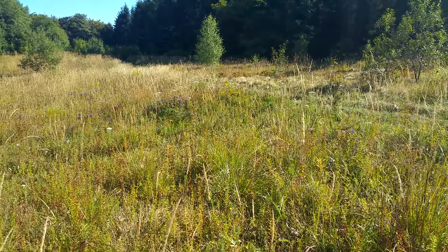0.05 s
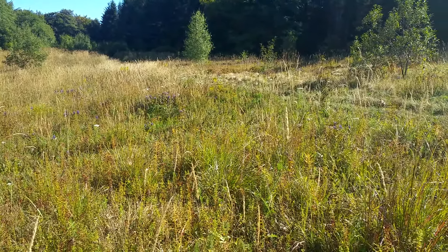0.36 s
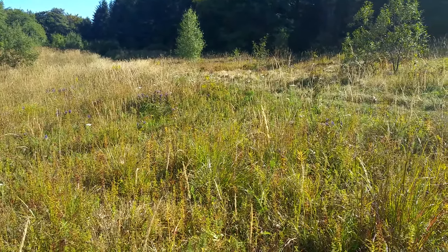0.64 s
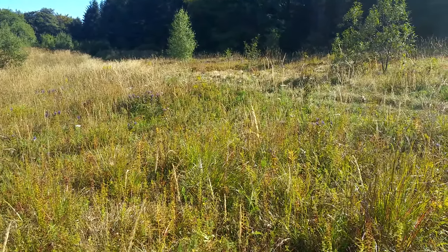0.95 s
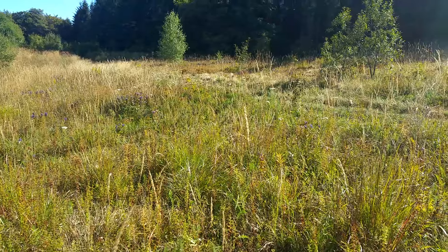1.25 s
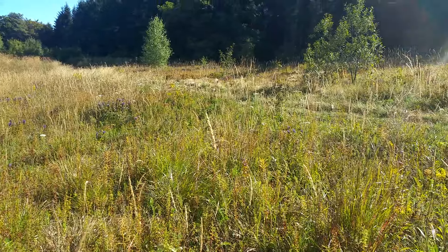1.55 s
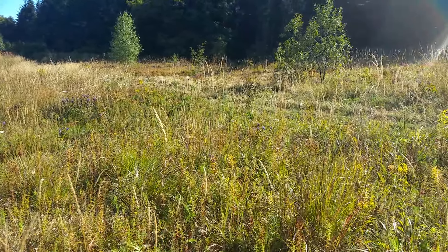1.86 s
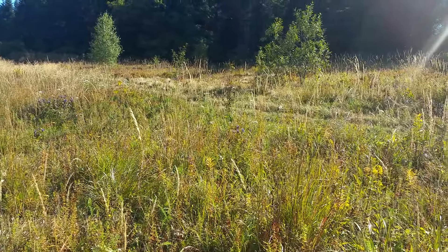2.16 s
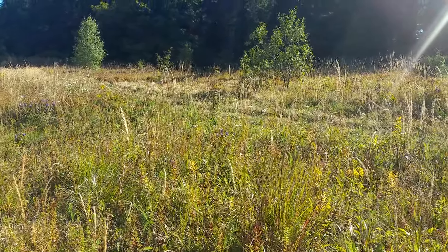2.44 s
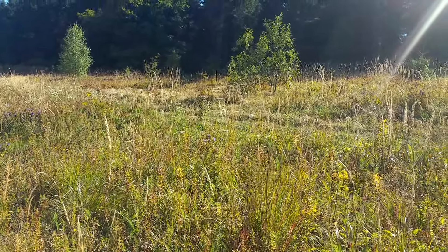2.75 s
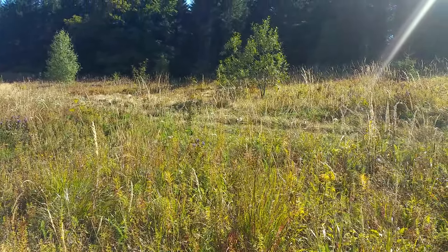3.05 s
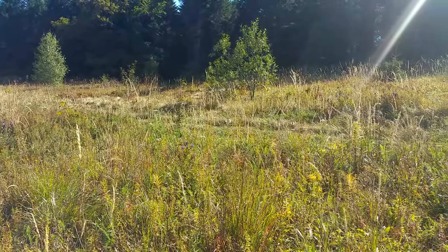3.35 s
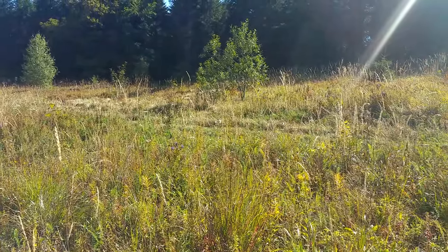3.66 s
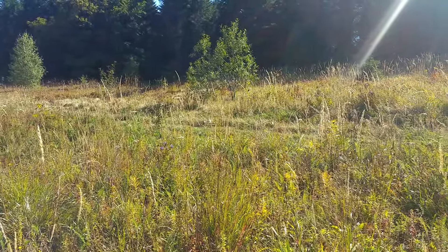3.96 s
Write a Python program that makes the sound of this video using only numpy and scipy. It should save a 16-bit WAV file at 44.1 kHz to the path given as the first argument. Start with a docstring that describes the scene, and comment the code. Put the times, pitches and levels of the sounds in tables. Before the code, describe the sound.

High, steady cricket buzzing in a field, joined late by quick close chirps.

```python
"""Bush crickets buzz in a sunny meadow, scraping toothed wings at about fifty strokes a second.
A close one joins with quick chirps, and a far chorus shimmers behind them all.
Treble bands swell and fade as the hand-held microphone slowly turns. Brushed grass rustles
and ticks, the hand bumps the housing, and a light breeze touches the microphone."""
import sys
import numpy as np
from scipy import signal
from scipy.fft import rfft, irfft
from scipy.io import wavfile

SR = 44100
rng = np.random.default_rng(int(sys.argv[2]) if len(sys.argv) > 2 else 0)


def wav_out(sig):
    """Save sig, one row per channel (or a flat mono array), as 16-bit PCM at SR to the path in sys.argv[1]."""
    wavfile.write(sys.argv[1], SR, np.round(np.clip(np.atleast_2d(sig).T, -1, 1) * 32767).astype(np.int16))


N = 176400

# bed of still air over the field (f/Hz, level/dB)
AIR_COLOUR = [(20, -11), (60, -2.5), (170, 0.5), (300, -1), (600, -5.5), (1500, -8.5), (3200, -12),
              (4800, -14), (8000, -19.5), (16000, -34)]
# breeze on the microphone: gusts (t/s, level/dB) and rumble (f/Hz, level/dB)
BREEZE_LEVEL = [(0, -86), (1.18, -80), (1.28, -66), (1.45, -60.5), (1.58, -66), (1.66, -62.5), (1.8, -49.5),
                (1.89, -69), (2.1, -70), (2.3, -78), (2.7, -79), (2.85, -56.5), (3.12, -60.5),
                (3.44, -68.5), (3.6, -50.5), (3.74, -67), (4, -73)]
BREEZE_COLOUR = [(12, -5), (30, -2), (55, 3), (100, -6.5), (170, -20.5), (400, -50.5), (1500, -60)]
# soft swish of brushed grass: fader (t/s, level/dB) and colour (f/Hz, level/dB)
SWISH_LEVEL = [(0, -88.5), (.45, -70.5), (.9, -72.5), (1.2, -60.5), (1.32, -67.5), (1.55, -65), (2.3, -73),
               (4, -98)]
SWISH_COLOUR = [(150, -14.5), (800, 0), (1800, -5.5), (6000, -23.5)]
# its crisp crunch: fader (t/s, level/dB) and colour (f/Hz, level/dB)
CRUNCH_LEVEL = [(0, -70.5), (.4, -70), (.6, -71), (1.1, -78), (1.19, -59), (1.235, -51), (1.275, -61),
                (1.3, -68), (1.58, -63.5), (1.75, -69), (2, -66.5), (2.3, -76), (4, -98)]
CRUNCH_COLOUR = [(500, -18), (1500, -8), (2700, 0), (4000, -3), (5200, -15.5), (9000, -32)]
# snapping stalks: cues (t/s, level/dB, centre f/Hz) and colour (multiple of centre, level/dB)
STALKS = [(.4587, -52, 2730), (.8226, -60.5, 3300), (1.229, -46, 2600), (1.2475, -46, 3560),
          (1.4955, -52.5, 2272), (1.570, -46.5, 3860), (1.589, -51.5, 3900), (1.636, -55, 2600),
          (1.739, -54.5, 4130), (1.7926, -46.5, 4060), (1.958, -53.5, 3240), (2.372, -60, 2930),
          (2.573, -59, 3620), (3.153, -55.5, 2900), (3.963, -59, 3900)]
STALK_COLOUR = [(.1, -10), (.5, -9.5), (.8, 2), (1.1, 2.5), (1.4, -13), (4, -30)]
# finger taps: cues (t/s, level/dB, centre f/Hz) and colour (multiple of centre, level/dB)
TAPS = [(.458, -60, 400), (.508, -55.5, 260), (.743, -58, 560), (3.475, -61.5, 1010)]
TAP_COLOUR = [(.2, -10), (1, 1.5), (2, -11), (5, -19.5), (16, -25.5)]
# bumps on the housing (t/s, f/Hz, envelope peak level/dB, rise/s)
BUMPS = [(1.751, 61.4, -41, 0.0074), (1.813, 62.2, -31, 0.007), (1.8352, 112.3, -31.5, 0.00444)]
# far chorus: fader (t/s, level/dB) and colour (f/Hz, level/dB)
CHORUS_LEVEL = [(0, -46.5), (.5, -48.5), (1.1, -48), (2.3, -48), (2.7, -49), (3, -50.5), (3.3, -53.5),
                (4, -46.5)]
CHORUS_COLOUR = [(4500, -35), (5500, -18.5), (6400, -17), (6900, -7), (7400, .5), (8500, 1), (9600, -2.5),
                 (10800, -1), (12000, -7), (13300, -10), (15000, -12.5), (16000, -9)]
# a lower buzzer and the faster neighbour that takes over (t/s, stroke rate/Hz, level/dB, ring f/Hz)
LOW_BUZZ = [(0, 63.8, -62, 7730), (.4, 47, -50, 7627), (.9, 51, -56.5, 7550), (1.4, 49.3, -52, 7450),
            (2, 46.2, -56.5, 7320), (2.6, 49.5, -57, 7060), (3, 44, -58, 7010), (3.15, 58, -72, 7120),
            (4, 69, -90, 7030)]
FAST_BUZZ = [(2.95, 76.7, -84, 7364), (3.15, 59, -58, 7440), (3.35, 59.5, -55, 7270),
             (3.55, 57.3, -53, 7230), (3.78, 55.5, -49.5, 7254), (4, 58.3, -46.5, 7267)]
# wing resonance of these two (f/Hz, level/dB)
LOW_WING = [(5500, -27.5), (6500, -27.5), (6950, -5), (7350, -3), (7700, -11), (8200, -14), (10000, -0.5),
            (12000, -28), (16000, -21)]
# close insect's chirps (last stroke t/s, level/dB)
CHIRPS = [(2.625, -45.5), (2.734, -41.5), (2.844, -39), (2.951, -40.5), (3.061, -39), (3.171, -40),
          (3.284, -40.5), (3.393, -39), (3.505, -40), (3.622, -41.5), (3.732, -40.5), (3.855, -41),
          (3.979, -43.5)]
# its wing resonance and its top sizzle (f/Hz, level/dB)
CHIRP_WING = [(5000, -30), (6500, -25), (7750, -13), (8300, 0), (9500, -5), (12400, -11), (16500, -8)]
SIZZLE_COLOUR = [(12500, -26), (13700, -8), (14700, 0), (16500, -9)]
# wide-band buzzer: pace (t/s, stroke rate/Hz) and fader (t/s, level/dB)
BUZZ_RATE = [(0, 47.2), (.2, 46.8), (.4, 45), (.9, 44.8), (1.3, 47), (1.8, 47.5), (2.8, 46.4), (3.25, 48),
             (4, 47.3)]
BUZZ_LEVEL = [(0, -43.5), (.05, -43.5), (.12, -45), (.16, -49.5), (.5, -48.5), (.72, -50), (.95, -57),
              (1.5, -52.5), (2, -57.5), (2.65, -54), (3.2, -55), (3.6, -49.5), (4, -49)]
# its broad wing resonance and its sharp wing modes (f/Hz, level/dB)
BUZZ_WING = [(5500, -44.5), (7000, -31), (7800, -7.5), (8600, 0.5), (9300, 0.5), (10000, -2), (10700, 3.5),
             (11300, -2), (11800, -10.5), (12500, -2), (13300, -18), (16000, -22)]
BUZZ_MODES = [(9880, -7.5), (10400, -13), (11680, -12)]
# microphone balance, left minus right (f/Hz, level/dB)
BALANCE = [(2800, 0), (4300, -3.5), (6000, -3.6), (7300, -4.5), (8150, -2.8), (8900, 0), (9550, 0),
           (10100, -2.3), (10900, -3), (11900, 0)]
# a very faint hiss, independent in left and right (f/Hz, level/dB)
HISS_COLOUR = [(60, 7.5), (300, 11), (700, 6.5), (1400, -24), (4000, -17), (8000, 1.5), (15000, -7.5)]

TIME, FREQS = np.arange(N) / SR, np.arange(N // 2 + 1) * SR / N


def undb(db):
    """Decibels to gain."""
    return 10 ** (np.asarray(db) / 20)


def unit(x):
    """Scale to rms 1."""
    return x / np.sqrt(np.mean(x ** 2))


def bell(x, width):
    """Gaussian swell that peaks at x = 0."""
    return np.exp(-.5 * (x / width) ** 2)


def curve(rows, column=1):
    """One column of a table, joined by straight lines in time."""
    rows = np.array(rows)
    return np.interp(TIME, rows[:, 0], rows[:, column])


def response(points):
    """EQ curve as gains, from (f/Hz, level/dB) points."""
    hz, db = np.array(points).T
    return undb(np.interp(np.log(FREQS + 1), np.log(hz), db))


def colour(x, points):
    """Apply an EQ curve and scale to rms 1."""
    return unit(irfft(rfft(x) * response(points), N))


def noise(points):
    """Coloured noise of rms 1."""
    return colour(rng.standard_normal(N), points)


def walk(rate_hz):
    """Smooth random motion of rms 1."""
    return unit(irfft(rfft(rng.standard_normal(N)) * np.exp(-(FREQS / rate_hz) ** 2), N))


def air(bed_db=-64):
    """A bed of still air, with low gusts of breeze on the microphone."""
    bed = noise(AIR_COLOUR) * undb(bed_db + .78 * walk(2.5))
    return bed + noise(BREEZE_COLOUR) * undb(curve(BREEZE_LEVEL))


def ticks(cues, shape, rise_s, decay_s):
    """Short dry contacts: noise bursts, each coloured around its own centre."""
    out = np.zeros(N)
    for at, db, hz in cues:
        age = np.maximum(TIME - at, 0)
        envelope = 2 * (1 - np.exp(-age / rise_s)) * np.exp(-age / decay_s)
        snap = envelope * noise([(hz * ratio, gain_db) for ratio, gain_db in shape])
        out += undb(db) * unit(snap) * np.sqrt(np.mean(envelope ** 2))
    return out


def grass():
    """Blades slide softly and crunch in fine grains; single dry stalks snap."""
    swish = noise(SWISH_COLOUR) * undb(curve(SWISH_LEVEL))
    grains = rng.standard_normal(N) * undb(3.7 * walk(500))
    crunch = colour(grains, CRUNCH_COLOUR) * undb(curve(CRUNCH_LEVEL))
    return swish + crunch + ticks(STALKS, STALK_COLOUR, rise_s=.000505, decay_s=.00203)


def handling():
    """Light finger taps and soft, heavily damped bumps on the housing."""
    out = ticks(TAPS, TAP_COLOUR, rise_s=.0011, decay_s=.006)
    for at, hz, db, rise in BUMPS:
        age = np.maximum(TIME - at, 0)
        envelope = (age / rise * np.exp(1 - age / rise)) ** 2
        out -= undb(db) * envelope * np.sin(2 * np.pi * hz * age)
    return out


def microphone_turn(x, bands=24, lowest_hz=6500, spacing_hz=454, depth_db=1.6):
    """Treble bands swell and fade, each on its own, as the microphone moves."""
    spectrum = rfft(x)
    for k in range(bands):
        band = np.maximum(1 - np.abs((FREQS - lowest_hz) / spacing_hz - k), 0)
        x = x + irfft(spectrum * band, N) * (undb(depth_db * walk(1.8)) - 1)
    return x


def teeth(rate_hz=4250, jitter=.3, scatter_db=4):
    """Uneven clicks of a scraper running over the teeth of a wing's file."""
    gap, strength = rng.standard_normal((N // 8, 2)).T
    at = (np.cumsum(np.exp(jitter * gap)) * SR / rate_hz).astype(int)
    clicks = np.bincount(at[at < N], undb(scatter_db * strength[at < N]), N)
    return colour(clicks - clicks.mean(), [(3000, -40), (5500, 0)])


def strokes(rate_hz, width, scatter_db=1.0):
    """Pulsing envelope of wing strokes, and the place in each; width and place are in cycles."""
    cycles = np.cumsum(rate_hz) / SR + .45
    place = cycles % 1 - .5
    size = undb(scatter_db * rng.standard_normal(N // 100))[cycles.astype(int)]
    return unit(size * bell(place, width)), place


def chorus():
    """Far insects at two drifting stroke rates merge into a shimmering hiss."""
    far = sum(noise(CHORUS_COLOUR) * strokes(rate_hz * (1 + .022 * walk(1.25)), width=.34)[0]
              for rate_hz in (48.5, 53.))
    return unit(far) * undb(curve(CHORUS_LEVEL) + .17 * walk(24))


def low_buzzer(table, ring_db, sag_hz):
    """A wing rasp with a narrow ring whose pitch sags through every stroke."""
    stroke, place = strokes(curve(table), width=.16)
    hz = curve(table, column=3) - sag_hz * place + 100 * walk(302.4)
    ring = np.sin(2 * np.pi * np.cumsum(hz) / SR) * (1 + .35 * walk(530))
    rasp = colour(teeth() * stroke, LOW_WING)
    return unit(rasp + undb(ring_db) * unit(ring * stroke)) * undb(curve(table, column=2))


def close_chirper(count=5, gap_s=.0155, growth_db=4.5, ring_hz=8730, ring_db=-2):
    """Each chirp is a few growing strokes: all sizzle on top, the strong ones ring with a rising tone."""
    rasp, sizzle, ring = np.zeros((3, N))
    waver_hz, grain = 220 * walk(510), 1 + .39 * walk(820)
    for at, db in CHIRPS:
        # k counts back from the last stroke
        for k, (late, louder) in enumerate(rng.standard_normal((count, 2))):
            centre = at - k * gap_s + .0003 * k * late
            near = slice(*np.searchsorted(TIME, [centre - gap_s, centre + gap_s]))
            age = TIME[near] - centre
            size = undb(db - k * growth_db + .52 * louder)
            rasp[near] += size * bell(age, .0035)
            sizzle[near] += undb(db - 10 - 1.3 * k + louder) * bell(age, .0048)
            ring_age = age + .00214  # the ring peaks just ahead of the rasp
            glide_hz_per_s = 130000 / (1 + k)
            hz = ring_hz - 250 * min(k, 2) + glide_hz_per_s * ring_age + waver_hz[near]
            ring[near] += size * bell(ring_age, .0026) * np.sin(2 * np.pi * np.cumsum(hz) / SR)
    scrape = teeth()
    scratch = rasp * colour(scrape, CHIRP_WING) + sizzle * colour(scrape, SIZZLE_COLOUR)
    return scratch + np.sqrt(2) * undb(ring_db) * ring * grain


def wide_buzzer(mode_half_width_hz=106):
    """Tooth clicks in even strokes drive a broadly tuned wing with a few sharp modes."""
    scrape = teeth() * strokes(curve(BUZZ_RATE), width=.13)[0]
    spectrum = rfft(scrape)
    modes = np.zeros(N)
    for hz, db in BUZZ_MODES:
        detune = (FREQS - hz) / mode_half_width_hz
        modes += undb(db) * unit(irfft(spectrum / (1 + 1j * detune) ** 2, N))
    return unit(colour(scrape, BUZZ_WING) + modes) * undb(curve(BUZZ_LEVEL))


def scene():
    """One mix feeds both channels; the right is stronger in two treble bands."""
    insects = microphone_turn(wide_buzzer() + chorus()) + close_chirper()
    insects += low_buzzer(LOW_BUZZ, ring_db=1, sag_hz=686)
    insects += low_buzzer(FAST_BUZZ, ring_db=3, sag_hz=397)
    mix = insects + air() + grass() + handling()
    balance = response(BALANCE)
    pan = 2 * np.array([balance, np.ones_like(balance)]) / (1 + balance)
    return irfft(rfft(mix) * pan, N)


def record(dry, hiss_db=-84.5, top_hz=15700, dc_offset=-.0006):
    """A very faint hiss, independent in left and right, then a steep high cut and a slight offset."""
    hiss = undb(hiss_db) * np.array([noise(HISS_COLOUR), noise(HISS_COLOUR)])
    high_cut = signal.ellip(12, .1, 80, top_hz, fs=SR, output="sos")
    return signal.sosfilt(high_cut, dry + hiss) + dc_offset


dry = scene()
out = record(dry)
wav_out(out)
```